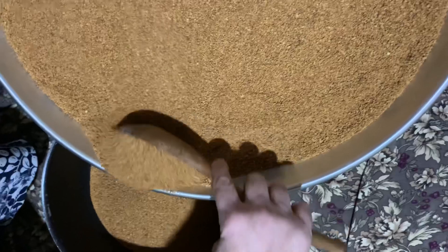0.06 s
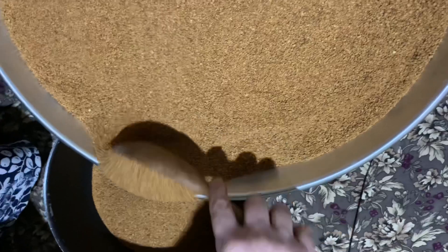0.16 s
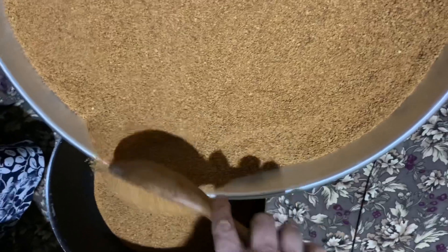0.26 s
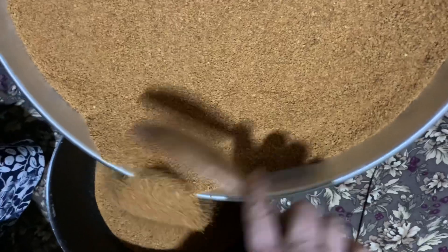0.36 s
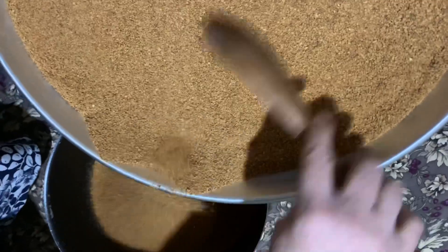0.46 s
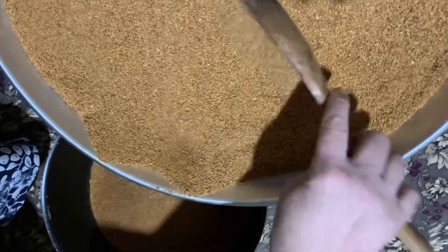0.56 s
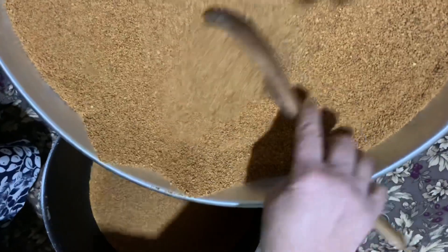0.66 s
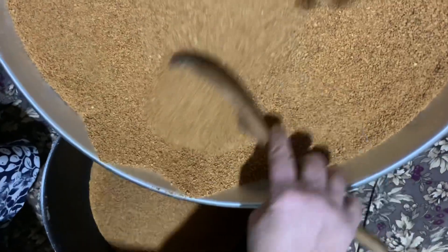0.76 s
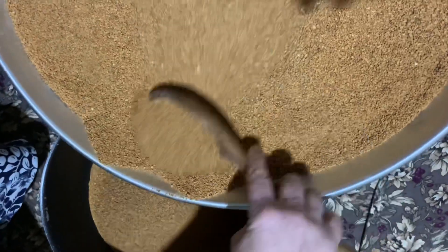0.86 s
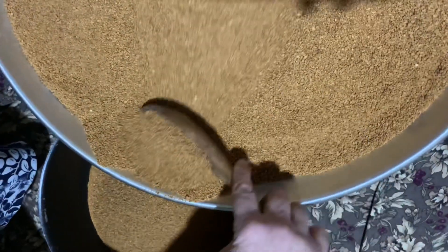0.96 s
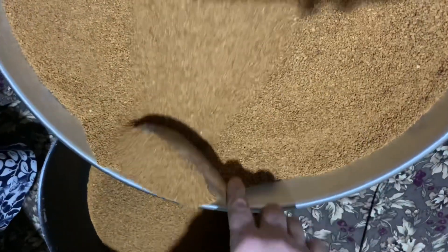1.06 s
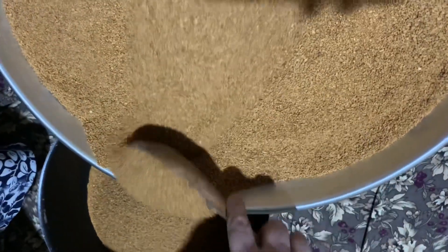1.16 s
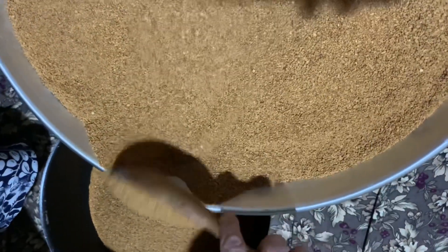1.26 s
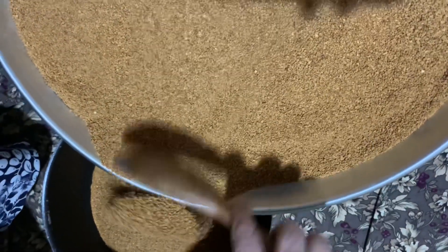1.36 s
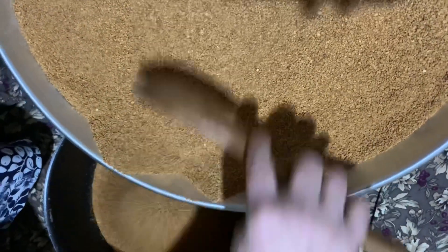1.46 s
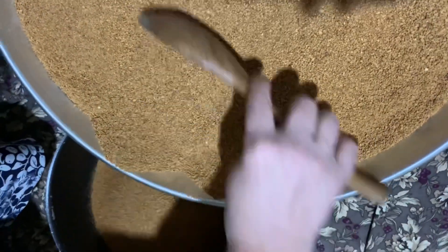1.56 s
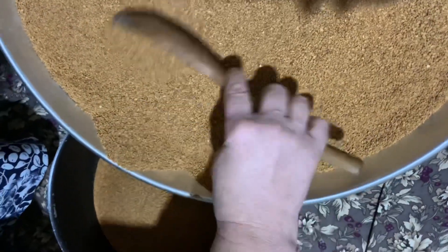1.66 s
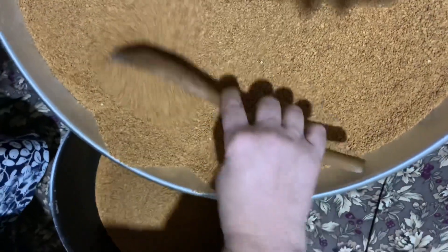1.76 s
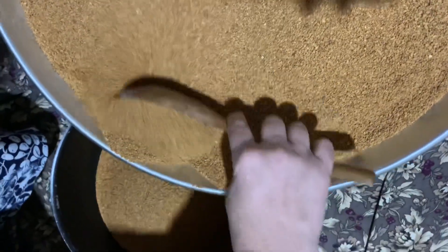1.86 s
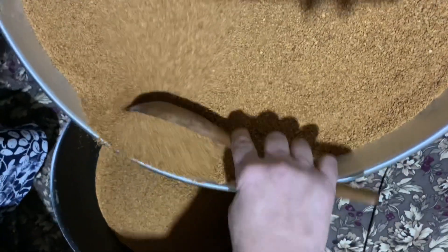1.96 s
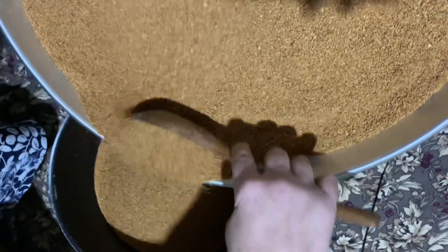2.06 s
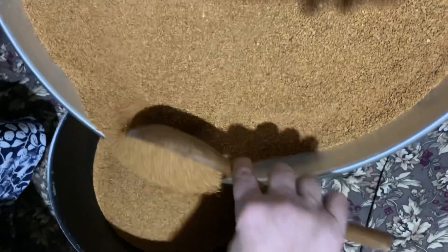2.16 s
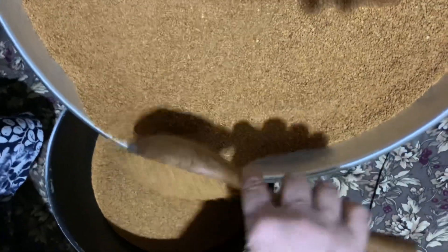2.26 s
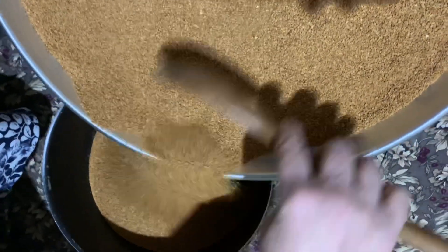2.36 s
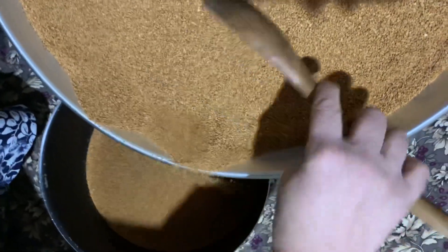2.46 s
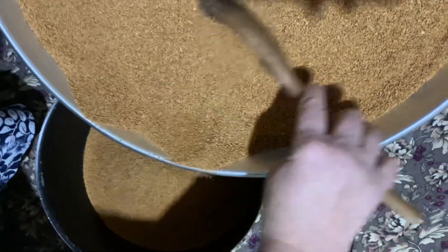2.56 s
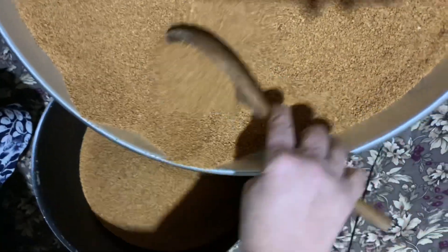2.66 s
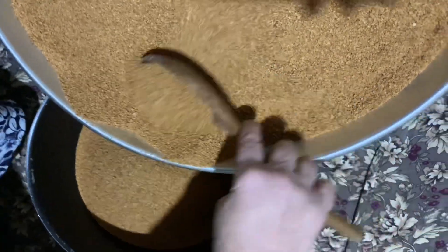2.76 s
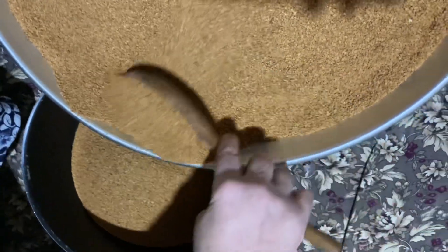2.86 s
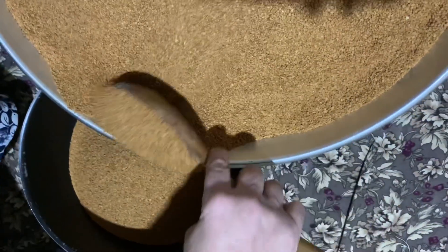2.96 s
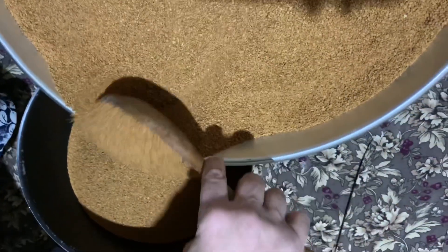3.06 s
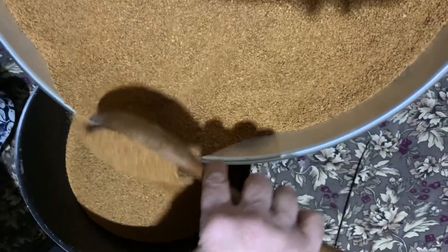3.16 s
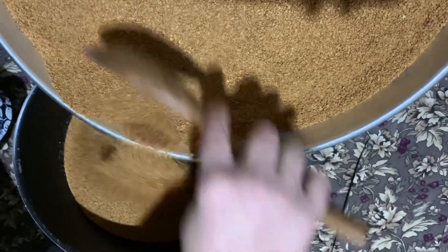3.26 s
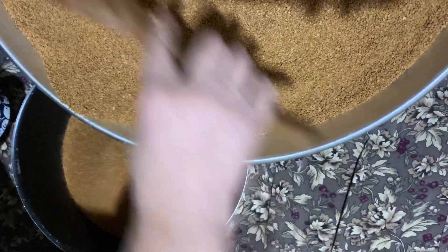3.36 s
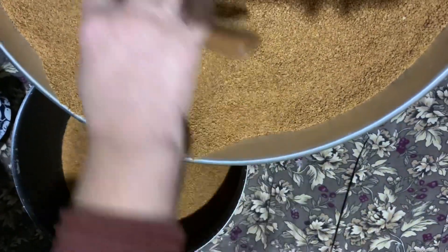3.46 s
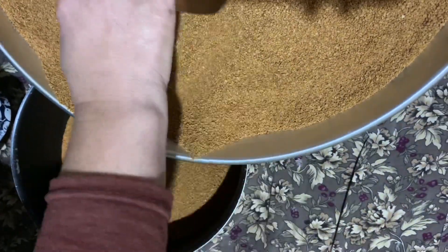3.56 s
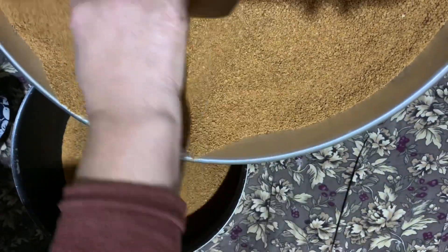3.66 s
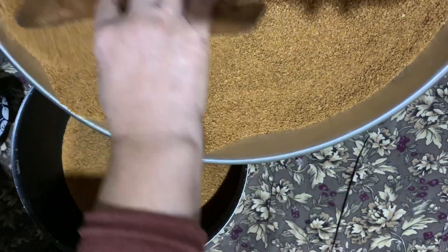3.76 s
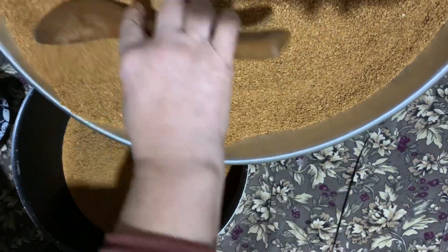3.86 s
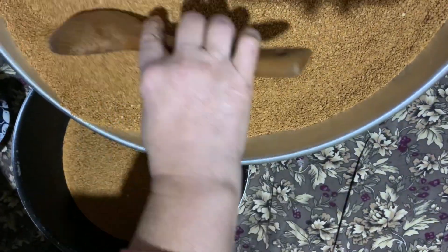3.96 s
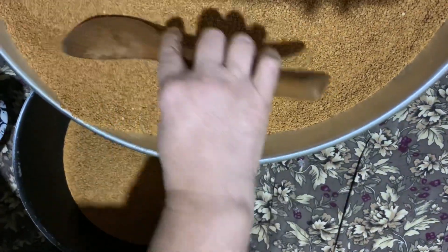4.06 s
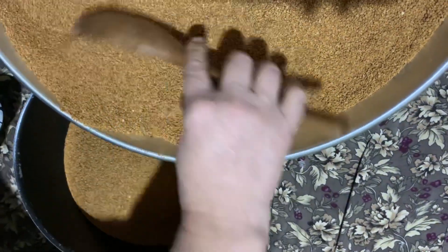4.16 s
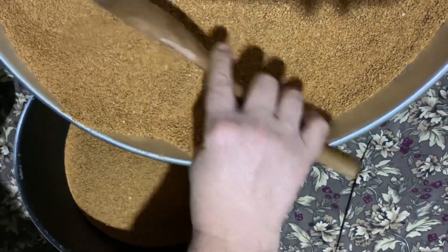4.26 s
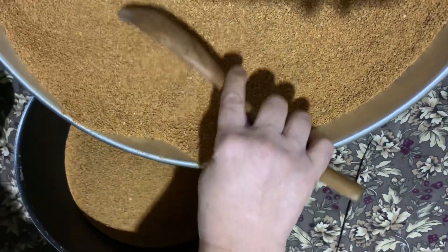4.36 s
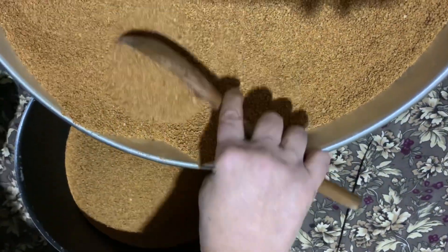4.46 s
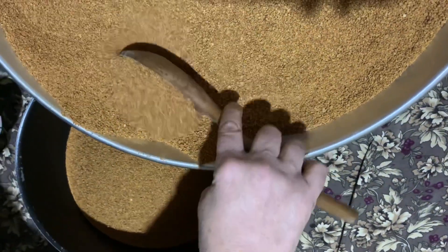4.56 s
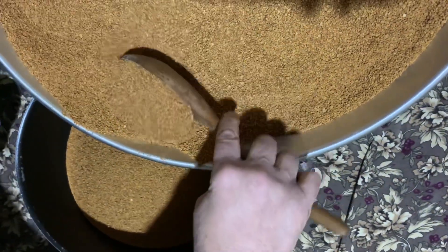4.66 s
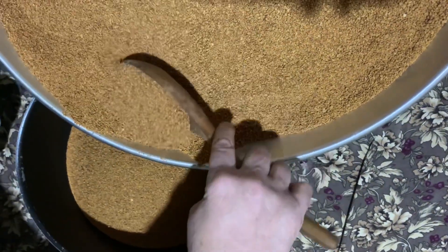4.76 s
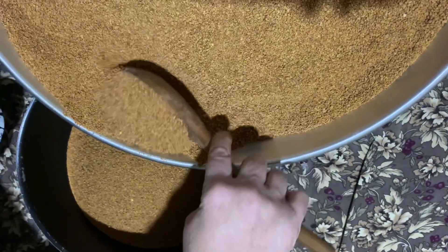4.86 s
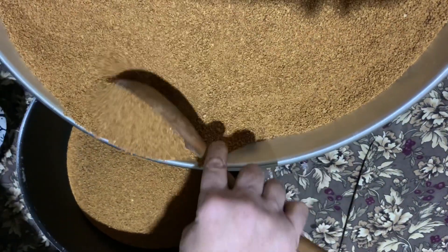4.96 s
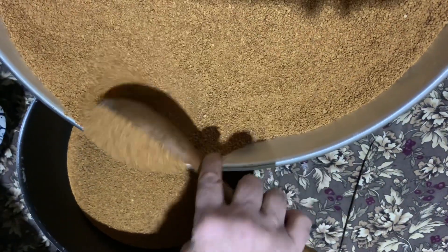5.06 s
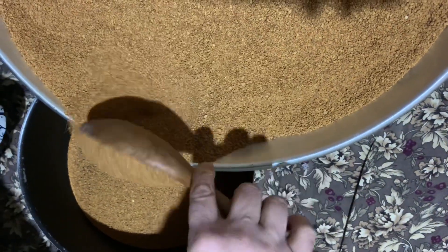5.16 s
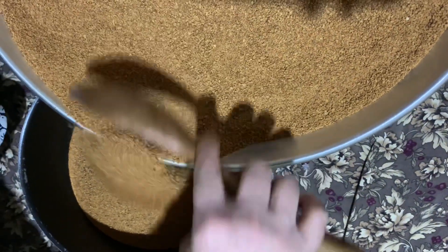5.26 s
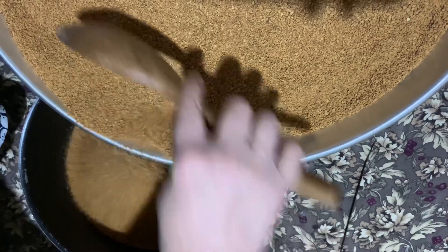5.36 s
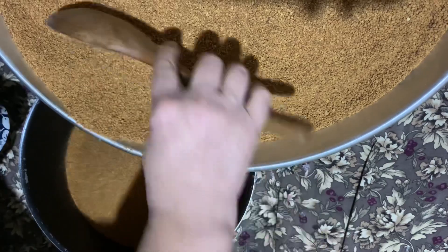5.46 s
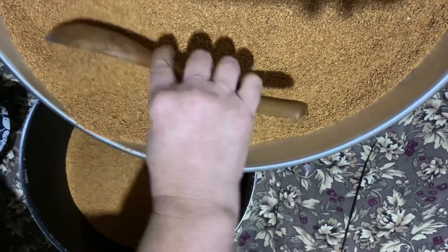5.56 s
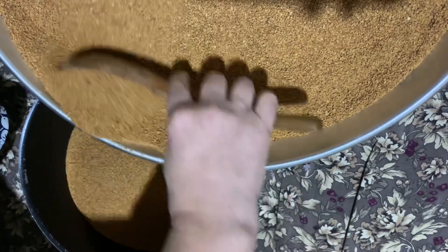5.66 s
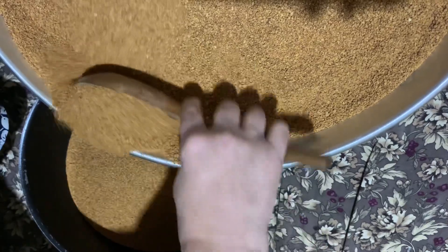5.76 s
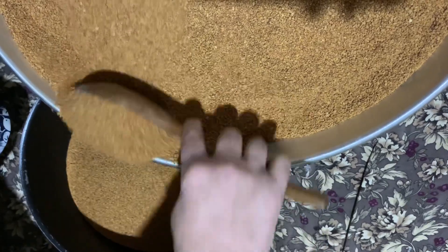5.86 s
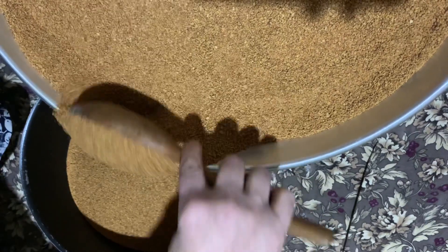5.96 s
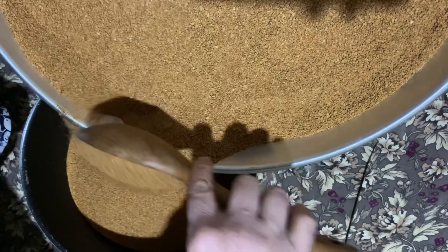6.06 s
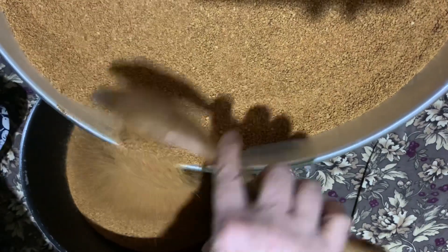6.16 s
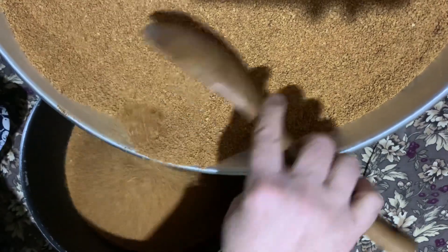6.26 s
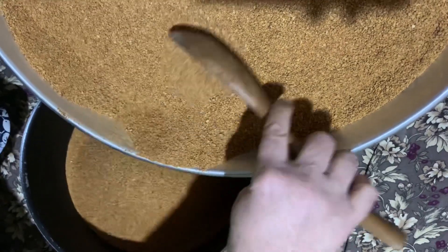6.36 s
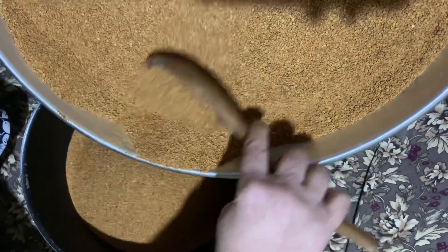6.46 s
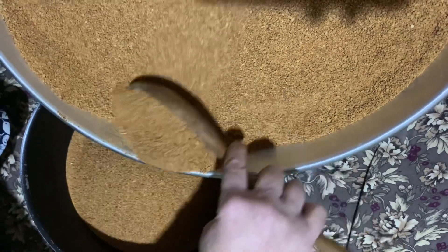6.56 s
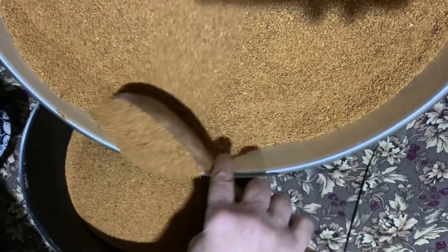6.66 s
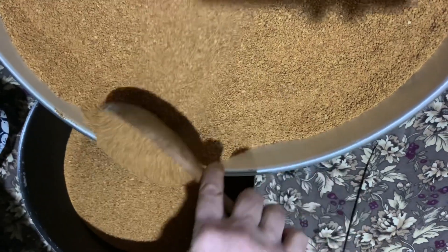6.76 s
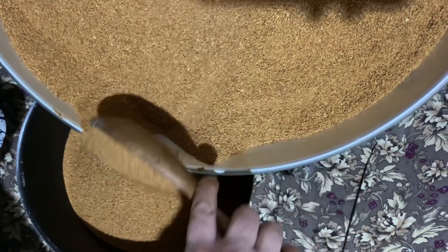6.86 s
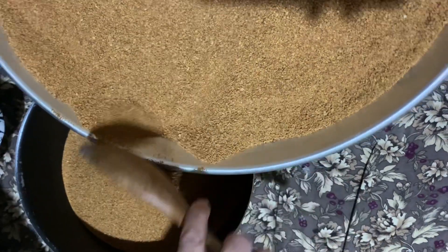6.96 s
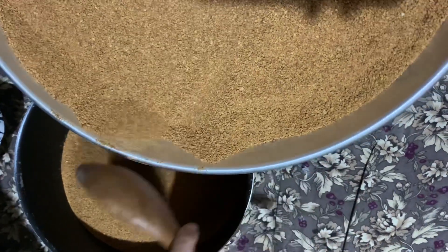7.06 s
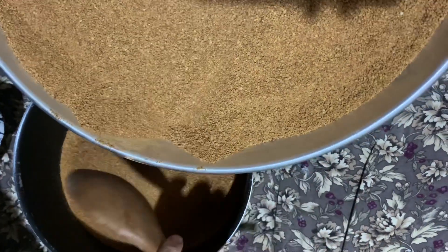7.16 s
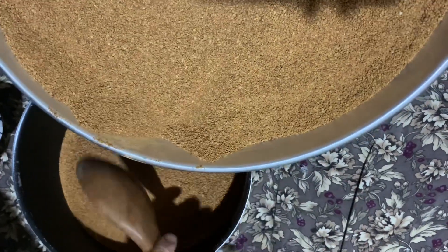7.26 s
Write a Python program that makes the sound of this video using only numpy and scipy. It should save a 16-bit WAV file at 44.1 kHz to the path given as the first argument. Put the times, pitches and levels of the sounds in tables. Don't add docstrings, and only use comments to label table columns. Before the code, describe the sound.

Close up in a quiet kitchen, a wooden spoon plunges into coarse dry meal on a metal tray about once a second. Each stroke starts with a sharp rush of grains and hollow tray thuds with woody clicks, then a fizzing slide and trickle. The last strokes are shorter and it ends nearly silent. Far outside, an engine faintly climbs through gears over traffic rumble. Stereo phone microphone just above.

```python
import sys
import numpy as np
from scipy import signal
from scipy.fft import rfft, irfft, next_fast_len
from scipy.io import wavfile
from scipy.ndimage import uniform_filter1d, map_coordinates

SR = 44100
rng = np.random.default_rng(int(sys.argv[2]) if len(sys.argv) > 2 else 0)


def makeup_ratio(level_db):
    decades = np.asarray(level_db, float) / 20
    return 10 ** decades


def persist_wave(psi):
    counts = np.round(np.clip(psi, -1, 1) * 32767).astype(np.int16)
    wavfile.write(sys.argv[1], SR, np.atleast_2d(counts).T)


N = 322812


def unit(x):
    return x / np.sqrt(np.mean(x ** 2) + 1e-20)


def along(points, hz):
    f, v = np.transpose(points)
    return np.interp(np.log(hz + 1), np.log(f + 1), v)


def curves(rows):
    s, *columns = np.transpose(rows)
    return [np.interp(np.arange(N) / SR, s, column) for column in columns]


def wobble(rate):
    knots = rng.standard_normal(int(N * rate / SR) + 4)
    return map_coordinates(knots, [np.arange(N) * rate / SR])


def filtered(x, response):
    m = next_fast_len(N + SR // 2)
    return irfft(rfft(x, m) * response(np.fft.rfftfreq(m, 1 / SR)), m)[..., :N]


def coloured(x, colour):
    return filtered(x, lambda f: makeup_ratio(along(colour, f)))


# start_s, firing_hz, level_db
ENGINE = [
    [(3.5, 57.1, -64), (3.614, 57.2, -46), (3.698, 59, -44.5), (3.796, 66.4, -51), (4.108, 65.9, -49),
     (4.288, 56.8, -45), (4.582, 52.9, -57), (4.774, 53.1, -57), (4.8, 53.3, -74)],
    [(4.85, 57.1, -64), (4.902, 56.75, -51), (5.128, 57, -45), (5.206, 57.5, -59), (5.334, 65.2, -43.5),
     (5.672, 73.2, -55.5), (5.76, 79.2, -50.5), (6.12, 78.3, -64), (6.2, 83, -65)],
    [(6.65, 100.4, -67), (6.672, 98, -55), (6.782, 101, -47.5), (6.994, 109, -58.5), (7.168, 107.5, -56),
     (7.184, 102.9, -69), (7.202, 105.4, -57.5), (7.262, 107.5, -54.5), (7.32, 108, -66)],
]
OCTAVE_DB = [-22, -12, -23]
# start_s, level_db
RUMBLE = [(0.0, -52), (1.16, -58), (1.49, -51), (2.04, -66), (3.44, -58), (3.73, -53.5), (4.2, -53.5),
          (4.75, -59), (5.32, -51), (5.99, -53), (7.32, -58)]
# pitch_hz, level_db (per Hz)
KITCHEN = [(25, -4), (55, 9.5), (100, 5.5), (160, -2.5), (350, -10.5), (1000, -49), (3000, -32.5),
           (8000, -42.5), (15000, -49.5)]


def street():
    drone, t = np.zeros(N), np.arange(N) / SR
    for gear, octave_db in zip(ENGINE, OCTAVE_DB):
        hz, db = curves(gear)
        begin, end = gear[0][0], gear[-1][0] + 0.044
        fade = np.clip(np.minimum(t - begin, end - t) / 0.057, 0, 1)
        phase = 2 * np.pi * np.cumsum(hz * (1 + 0.0202 * wobble(26))) / SR
        tone = np.sin(phase) + makeup_ratio(octave_db) * np.sin(2 * phase)
        drone += fade * makeup_ratio(5.5 + 1.3 * wobble(18)) * makeup_ratio(db) * tone
    hush = unit(coloured(rng.standard_normal((2, N)), KITCHEN))
    return drone + makeup_ratio(curves(RUMBLE)[0] - 1.5 + 1.2 * wobble(2.5)) * hush


SQUEAK_S, SQUEAK_LENGTH_S, SQUEAK_DB = 7.22, .09, -65
SQUEAK_HZ, SQUEAK_SAG_HZ_PER_S = 2130, 1900


def squeak():
    u = np.clip(np.arange(N) / SR - SQUEAK_S, 0, SQUEAK_LENGTH_S)
    swell = np.sin(np.pi * u / SQUEAK_LENGTH_S)
    return makeup_ratio(SQUEAK_DB) * swell * np.sin(2 * np.pi * (SQUEAK_HZ - SQUEAK_SAG_HZ_PER_S * u / 2) * u)


# start_s (middle), half_width_s, pitch_hz, level_db
RUBS = [(0.531, .012, 2100, -34.5), (1.751, 0.019, 4100, -48), (1.985, 0.045, 3940, -46),
        (1.99, 0.038, 1670, -49.5), (2.049, .02, 2940, -53), (3.4, 0.063, 4000, -55.5),
        (3.42, 0.055, 2020, -60.5), (3.7, .05, 3920, -62), (4.22, 0.046, 2120, -54),
        (4.22, 0.047, 4000, -61), (2.961, 0.032, 3250, -56), (5.59, .015, 3300, -42.5),
        (5.601, .02, 1200, -48.5), (5.74, 0.037, 4180, -45.5), (5.776, 0.017, 3400, -47),
        (5.81, .03, 4160, -44), (5.892, .02, 3180, -52.5), (6.92, 0.037, 6200, -60.5),
        (7.09, 0.043, 4200, -73), (7.11, 0.075, 2010, -72.5), (7.14, .03, 5180, -78.5),
        (7.12, 0.044, 3000, -74), (7.0, 0.038, 3700, -74), (7.22, 0.0057, 6350, -58),
        (7.255, 0.032, 3020, -76), (7.26, .03, 5000, -86)]
RUB_WIDTH, RUB_CHATTER_DB = 0.13, 2


def rubs():
    out, t = np.zeros((2, N + SR)), np.arange(-SR // 8, SR // 8) / SR
    chatter = makeup_ratio(RUB_CHATTER_DB * wobble(160))
    for (s, half, hz, db), noise in zip(RUBS, rng.standard_normal((len(RUBS), 2, len(t)))):
        tone = unit(signal.lfilter(*signal.iirpeak(hz, 1 / RUB_WIDTH, SR), noise))
        out[:, round(s * SR) - SR // 8:][:, :len(t)] += makeup_ratio(db - 5 * (t / half) ** 2) * tone
    return chatter * out[:, :N]


LATE_S = .001
# start_s, level_db (peak), pitch_hz
CLICKS = [(0.047, -26.5, 915), (0.071, -37, 770), (0.125, -45, 800), (0.457, -28.5, 746), (0.464, -24, 760),
          (0.479, -21.5, 791), (0.528, -26, 751), (0.551, -36, 764), (0.567, -29, 1060), (0.597, -39, 1280),
          (0.656, -32.5, 760), (0.696, -33, 1000), (0.975, -42, 894), (1.103, -34, 1310), (1.333, -50, 775),
          (1.49, -26, 784), (1.517, -27, 1240), (1.522, -23.5, 970), (1.56, -26, 751), (1.56, -21.5, 794),
          (1.573, -28.5, 802), (1.617, -40, 851), (1.643, -38.5, 751), (2.391, -27.5, 856),
          (2.406, -23.5, 1040), (2.775, -30, 1010), (2.789, -33.5, 842), (2.808, -34, 993),
          (3.464, -32, 902), (3.636, -32, 923), (4.233, -42, 867), (4.289, -21, 789), (5.399, -18, 950),
          (5.429, -19, 826), (5.464, -22.5, 907), (5.523, -28, 1060), (5.583, -33, 1170),
          (5.687, -44, 1350), (6.226, -23, 751), (6.268, -32, 751), (6.434, -34, 756), (6.494, -38, 1500),
          (6.513, -31, 1190)]
CLICK_DB, CLICK_CYCLES = -1.5, 13
# start_s, level_db (peak), pitch_hz
TICKS = [(0.0474, -37, 2200), (0.071, -43.5, 2380), (0.4574, -24, 2240), (0.4654, -28.5, 1770),
         (0.4907, -24.5, 1470), (0.4893, -22.5, 3650), (0.5252, -25.5, 1920), (0.5516, -24.5, 2160),
         (0.5674, -28.5, 1840), (0.5774, -34.5, 2190), (0.5975, -42, 1890), (0.6285, -36, 2210),
         (0.6564, -36.5, 2160), (0.696, -41.5, 1870), (1.103, -41, 3700), (1.489, -32, 2270),
         (1.5174, -21, 1510), (1.5214, -23, 2170), (1.5604, -16.5, 1630), (1.5624, -18, 1620),
         (1.5734, -26.5, 1700), (1.6174, -37, 2430), (1.9634, -38, 3990), (2.3735, -34.5, 1970),
         (2.3898, -21, 2610), (2.3935, -23.5, 3660), (2.4014, -22, 2070), (2.408, -24, 2000),
         (2.417, -23.5, 2030), (2.7742, -32, 1560), (2.79, -40, 1780), (2.8074, -41, 1560),
         (2.9739, -20, 2050), (3.357, -31, 3200), (3.464, -33, 1730), (4.2887, -14, 2120),
         (5.3993, -25.5, 1520), (5.427, -35, 2090), (5.4634, -38, 1880), (5.582, -37, 3260),
         (5.7339, -34, 3990), (5.7678, -36, 3460), (5.8047, -30, 3250), (5.8333, -33, 2900),
         (6.228, -29.5, 2020), (6.268, -29, 1970), (6.4966, -37, 3700), (6.5124, -32, 3030),
         (6.5665, -36, 3050), (6.6474, -41.5, 3650)]
TICK_DB, TICK_CYCLES = 0.5, 16
OVERTONE_RATIO, CRACK, CRACK_S = 2.1, 0.92, .007


def clicks(rows, gain_db, cycles):
    out, t = np.zeros(N + SR), np.arange(SR // 40) / SR
    for (s, db, hz), noise in zip(rows, rng.standard_normal((len(rows), len(t)))):
        tone = np.sin(2 * np.pi * hz * t) + .3 * np.sin(2 * np.pi * OVERTONE_RATIO * hz * t)
        ring = tone * makeup_ratio(-60 * t * hz / cycles)
        crack = CRACK * uniform_filter1d(noise, size=5) * makeup_ratio(-60 * t / CRACK_S)
        out[round((s + LATE_S) * SR):][:len(t)] += makeup_ratio(db + gain_db) * (ring + crack)
    return out[:N]


def grains(per_second, spread_db, smooth):
    chance, size = rng.random((2, 2, N))
    sizes = makeup_ratio(-spread_db * np.log(size + 0.086))
    hits = (chance < per_second / SR) * sizes * rng.standard_normal((2, N))
    smooth = np.clip(smooth, 0, 1)
    return np.sqrt(1 - smooth) * unit(hits) + np.sqrt(smooth) * rng.standard_normal((2, N))


# start_s, level_db (thud peak), pitch_hz (local thud), crunch_db (over thud)
KNOCKS = [(0.049, -19, 346, -14.5), (0.457, -8.5, 380, -5.5), (0.463, -12.5, 324, -12.5),
          (.479, -7, 358, -9), (.527, -17.5, 400, -5.5), (0.566, -21.5, 352, -4), (0.657, -24, 557, -8.5),
          (0.697, -19.5, 264, -32.5), (0.978, -34, 165, -17), (1.103, -27.5, 280, -9),
          (1.491, -9, 264, -7.5), (1.557, -13, 396, 4), (1.5606, -1, 335, -9.5), (2.371, -28.5, 350, 4),
          (2.393, -11.5, 350, -15.5), (2.406, -7, 353, -5), (3.466, -18, 277, -16.5),
          (3.637, -23.5, 380, -15), (4.278, -17.5, 360, -25), (4.288, -11, 480, -11.5),
          (4.308, -34.5, 377, -5.5), (5.401, -9.5, 524, -7), (5.429, -18, 360, -7), (5.462, -29.5, 380, -1),
          (6.229, -14.5, 326, -3.5)]
BARE_RIM_DB, BARE_KNOCK_DB = -3.5, -12.5
# start_s, level_db (thud peak), pitch_hz (local thud), crunch_db (over thud)
THUDS = [(.072, -27.5, 268, -0.5), (0.124, -23, 358, -24), (.315, -38.5, 377, -25), (.489, -14.5, 330, 6),
         (.492, -8.5, 264, -17.5), (.534, -6, 282, -22.5), (1.333, -27.5, 473, -18), (1.517, -9, 350, -1),
         (1.523, -1, 313, -16), (1.572, -13.5, 280, -14), (1.586, -14, 350, -4), (1.639, -23, 550, -2),
         (2.398, -11.5, 348, -7.5), (2.401, -13.5, 330, -13.5), (2.412, -13, 346, -12),
         (2.418, -13, 246, -25), (2.565, -32, 380, -16.5), (2.79, -24, 368, -7), (2.808, -29.5, 140, -7),
         (2.971, -18.5, 372, -8), (3.159, -36.5, 478, -6), (3.345, -36.5, 496, -8), (3.545, -30, 344, -14),
         (3.655, -24.5, 390, -20), (4.295, -19, 410, -32), (5.418, -14.5, 378, -28),
         (5.702, -21, 494, -15.5), (5.871, -30, 363, -23), (6.221, -21, 567, -6.5), (6.513, -24.5, 260, 5),
         (6.648, -25, 261, -4), (6.757, -27.5, 273, -24)]
SOFT_RIM_DB, SOFT_KNOCK_DB = -18.5, -16
# start_s, level_db (crunch peak), knock_db (over crunch)
BITES = [(.423, -22, -29), (0.553, -26, -4), (0.597, -32.5, -29.5), (1.416, -26.5, -44.5),
         (1.485, -25.5, -3.5), (2.35, -34.5, -12), (2.773, -23, 3), (3.328, -40.5, -36), (5.31, -32.5, -34),
         (5.582, -27, -4), (5.733, -34.5, -3.5), (5.77, -37, -12), (5.804, -40, -7), (5.831, -42, -4),
         (6.193, -23.5, -18), (6.267, -22, -9), (6.435, -31, -12), (6.497, -17.5, -8.5), (6.567, -25.5, -5),
         (7.213, -41.5, -24)]
BITE_THUD_DB, BITE_HZ, BITE_RIM_DB = -10, 350, -3.5


def contacts():
    bare = [(s, db, hz, BARE_RIM_DB, BARE_KNOCK_DB, crunch_db) for s, db, hz, crunch_db in KNOCKS]
    soft = [(s, db, hz, SOFT_RIM_DB, SOFT_KNOCK_DB, crunch_db) for s, db, hz, crunch_db in THUDS]
    bites = [(s, db + BITE_THUD_DB, BITE_HZ, BITE_RIM_DB, knock_db - BITE_THUD_DB, -BITE_THUD_DB)
             for s, db, knock_db in BITES]
    return bare + soft + bites


def strike(modes, t, level_db):
    ring = sum(makeup_ratio(db + extra - 60 * t / t60) * np.sin(2 * np.pi * hz * t)
               for (hz, t60, db), extra in zip(modes, level_db))
    return ring / np.abs(ring).max()


# pitch_hz, t60_s, level_db
TRAY = [(131, 0.011, -14), (195, 0.094, -10.5), (264, 0.2, -5.5), (350, 0.11, -1), (424.2, 0.081, -4.5),
        (530.8, 0.094, -5.5)]
# pitch_hz, t60_s, level_db
RIM = [(608, 0.031, 4.5), (711.5, 0.039, 4.5), (793, 0.034, 4), (916, 0.025, 4), (1056, 0.018, 2.5),
       (1147, 0.06, -6)]
# pitch_hz, t60_s, level_db
SPOON = [(1615, .03, -12), (1870, 0.051, 13), (2070, 0.098, 18), (3650, 0.013, 20)]
# pitch_hz, level_db (per Hz)
RASP = [(700, -9), (1300, -6.5), (1900, -4), (2500, -4.5), (3200, -7.5), (4500, -11), (6000, -14.5),
        (8000, -19.5)]
# pitch_hz, level_db (per Hz)
FIZZ = [(1500, -19.5), (3000, -14), (5000, -14.5), (7000, -9.5), (8600, -4), (10200, -4.5), (11500, -2.5),
        (13500, -5), (15500, -4.5)]
DENT_CYCLES = 6.1
SNAP, SNAP_RATIO, SNAP_S = 0.35, 1.7, 0.015


def bumps():
    out, t = np.zeros((2, N + SR)), np.arange(SR // 5) / SR
    crush = np.zeros((2, N + SR))
    luck = rng.standard_normal((len(contacts()), 3, len(TRAY)))
    for (s, db, hz, rim_db, knock_db, crunch_db), own in zip(contacts(), luck):
        start = round((s + LATE_S) * SR)
        at = slice(start, start + len(t))
        dent = np.sin(2 * np.pi * hz * t) * makeup_ratio(-60 * (t * hz / DENT_CYCLES) ** 2)
        snap = SNAP * np.sin(2 * np.pi * SNAP_RATIO * hz * t) * makeup_ratio(-60 * t / SNAP_S)
        thud = snap + 0.7 * dent + 0.5 * strike(TRAY, t, 4 * own[0])
        thud += makeup_ratio(rim_db + 7.5) * strike(RIM, t, 4 * own[1])
        thud *= 1 - np.exp(-t / 0.0015)
        knock = strike(SPOON, t, 3 * own[2])
        out[:, at] += makeup_ratio(db - 3.0) * thud + makeup_ratio(db + knock_db - 11.5) * knock
        crush[0, at] += makeup_ratio(db + knock_db - 1 - 60 * t / 0.035) * (1 - np.exp(-t / 0.0023))
        crush[1, at] += makeup_ratio(db + crunch_db - 1.0) * (makeup_ratio(-60 * t / 0.0084) + 0.35 * makeup_ratio(-60 * t / 0.03))
    dull, bright = [unit(coloured(grains(8000, 2.48, smooth=0.55), colour)) for colour in (RASP, FIZZ)]
    return out[:, :N] + crush[0, :N] * dull + crush[1, :N] * bright


# start_s, pull_s, flow_db (grains), drag_db (spoon), fade_db_per_s (trickle)
STROKES = [
    (-.1, 0.2, -51, -61.5, 36),
    (0.424, 0.61, -44, -55, 41),
    (1.415, 0.57, -43.5, -55.5, 24.5),
    (2.351, 0.69, -51, -58.5, 32.5),
    (3.324, 0.68, -47.5, -58.5, 120),
    (4.158, 0.48, -55, -61.5, 9.5),
    (5.307, 0.59, -44, -56.5, 65),
    (6.192, 0.47, -46.5, -60, 46.5),
    (7.208, 0.0075, -59, -66.5, 252),
]


def humps(rows, clock):
    s, half, *levels = np.transpose(rows)[..., None]
    plunges = np.transpose(STROKES)[0]
    begun = clock >= plunges[np.searchsorted(plunges, s) - 1]
    bell = begun * makeup_ratio(-12 * ((clock - s) / half) ** 2)
    return [(makeup_ratio(2 * db) * bell).sum(axis=0) for db in levels]


# start_s (middle), half_width_s, flow_db
SPILLS = [(.27, 0.035, -68), (.48, 0.056, -44), (.6, .05, -43), (.97, 0.1, -46.5), (1.3, 0.036, -65),
          (1.55, 0.039, -46), (1.76, 0.076, -45.5), (1.98, 0.082, -44), (2.41, 0.09, -45), (2.66, .08, -50),
          (2.815, 0.056, -46.5), (3.68, .1, -49.5), (4.05, .03, -50.5), (4.17, .07, -46.5),
          (4.28, .04, -43), (4.75, .06, -53.5), (4.9, 0.11, -54), (5.05, 0.053, -53.5), (5.19, 0.11, -63),
          (5.42, 0.071, -49.5), (5.6, 0.038, -47), (5.72, 0.056, -49), (6.23, 0.022, -38.5),
          (6.5, 0.068, -43.5), (6.93, 0.03, -56.5), (7.05, 0.067, -69.5), (7.32, .008, -57.5)]
# start_s (middle), half_width_s, scrape_db, weight_db (on the tray)
SHOVES = [(.07, 0.039, -53.5, -55), (.48, 0.032, -46.5, -44.5), (.6, 0.092, -52, -58),
          (.97, 0.06, -52, -61), (1.1, 0.034, -58.5, -57.5), (1.3, 0.017, -75.5, -63),
          (1.45, 0.01, -95, -57.5), (1.55, 0.066, -50.5, -48), (2.02, 0.072, -56.5, -56),
          (2.08, 0.01, -62, -56), (2.2, 0.049, -88, -76.5), (.28, 0.069, -82, -71.5),
          (2.41, 0.022, -44.5, -46.5), (2.65, 0.093, -57.5, -61), (2.805, 0.038, -49, -66.5),
          (3.44, 0.0442, -59.5, -53), (3.64, 0.21, -83, -61), (4.18, 0.058, -71, -57.5),
          (4.28, 0.041, -55.5, -44.5), (4.5, 0.19, -66, -70), (4.92, 0.089, -63, -68),
          (5.42, 0.045, -52.5, -42.5), (5.6, 0.015, -64.5, -56), (5.8, 0.07, -55, -74),
          (6.24, 0.024, -46.5, -41.5), (6.35, 0.072, -58, -53.5), (6.5, 0.11, -55.5, -78),
          (6.65, 0.021, -51.5, -77), (6.73, 0.061, -64.5, -56.5)]
PLUNGE_S, DIG_IN_S = 0.0021, 0.069
PULL_SAG_DB_PER_S = 10.5
LIFT_S, LIFT_FLOW_DB, LIFT_DRAG_DB = 0.0097, -1, -5.5


def motion():
    start, pull, flow_db, drag_db, fade = np.transpose(STROKES)[..., None]
    clock = np.arange(N * 1000 // SR + 2) / 1000
    since = clock - start
    after = np.maximum(clock - start - pull, 0)
    shape_db = -PULL_SAG_DB_PER_S * np.clip(since, 0, pull) - fade * after
    lifted = np.clip(after / LIFT_S, 0, 1)

    def power(db, fall_db, rise_s):
        rise = np.clip(since / rise_s, 0, 1) ** 2
        return (rise * makeup_ratio(2 * (db + shape_db + fall_db * lifted))).sum(axis=0)

    flow = power(flow_db, LIFT_FLOW_DB, PLUNGE_S)
    drag = power(drag_db, LIFT_DRAG_DB, DIG_IN_S)
    (spill,), (scrape, weight) = humps(SPILLS, clock), humps(SHOVES, clock)
    powers = flow + spill, drag + scrape, drag + weight
    return [np.interp(np.arange(N) / SR, clock, np.sqrt(p)) for p in powers]


def ringing(modes, damping):
    def response(f):
        total = 0
        for k, (centre, t60, db) in enumerate(modes):
            loss = 1j * f * damping * np.log(1000) / (np.pi * t60)
            total = total + (-1) ** k * makeup_ratio(db) * loss / (centre * centre - f * f + loss)
        return total
    return response


def patchy(x, depth_db):
    z = signal.stft(x, nperseg=512)[2]
    field = uniform_filter1d(rng.standard_normal(z.shape[1:]), size=9, axis=0)
    field = uniform_filter1d(field, size=7, axis=1)
    return signal.istft(z * makeup_ratio(depth_db * unit(field)), nperseg=512)[1][:, :N]


# pitch_hz, level_db (per Hz)
CRACKLE = [(900, -17.5), (1800, -5.5), (2600, -1), (4000, 0), (6000, -3), (9000, -12.5)]
WALL_DB, FLOOR_DB = 1, 7


def meal():
    flow, scrape, weight = motion()
    clump = wobble(30)
    fizz = coloured(makeup_ratio(0.6 * wobble(200)) * grains(14000, 0.72, smooth=0.69), FIZZ)
    rasp = coloured(makeup_ratio(1.7 * wobble(150)) * grains(4000, 1.4, smooth=0.55), RASP)
    wall = filtered(makeup_ratio(3.5 * wobble(90)) * grains(1400, 3.8, smooth=0.86), ringing(RIM, damping=0.79))
    drum = filtered(makeup_ratio(4.4 * wobble(60)) * grains(900, 1.53, smooth=0.85), ringing(TRAY, damping=0.87))
    crackle = coloured(makeup_ratio(5.8 * wobble(40)) * grains(260, 5, smooth=0), CRACKLE)
    tray = makeup_ratio(WALL_DB + 2.5) * unit(wall) + makeup_ratio(FLOOR_DB + 2.0) * unit(drum)
    return (scrape * makeup_ratio(1) * unit(crackle)
            + flow * makeup_ratio(9.0 + 1.6 * clump) * unit(patchy(fizz, depth_db=2.5))
            + scrape * makeup_ratio(9 + 0.88 * clump) * unit(patchy(rasp, depth_db=3.0))
            + weight * makeup_ratio(1.3 * clump) * tray)


def scene():
    edge = clicks(CLICKS, CLICK_DB, CLICK_CYCLES) + clicks(TICKS, TICK_DB, TICK_CYCLES)
    return meal() + bumps() + street() + edge + rubs() + squeak() * [[0], [1]]


GATE_DB, GATE_HZ, GATE_FLOOR = -100, 2900, .2
QUIET_DB = -89


def joint(pair, under_db, from_hz, size=10):
    sum_and_difference = np.array([pair[0] + pair[1], pair[0] - pair[1]]) / 2
    hz, _, z = signal.stft(sum_and_difference, SR, nperseg=1280)
    band = np.arange(len(hz)) // size
    power = np.add.reduceat(np.abs(z) ** 2, np.arange(0, len(hz), size), axis=1)
    power = uniform_filter1d(power, size=3, axis=2)
    keep = (power > makeup_ratio(2 * under_db) * power[::-1])[:, band] | (hz < from_hz)[:, None]
    treble = (np.abs(z[:, hz > GATE_HZ]) ** 2).mean(axis=(0, 1))
    keep = np.maximum(keep, 1 / (1 + (treble / makeup_ratio(2 * QUIET_DB)) ** 2))
    gate = np.maximum(treble / (treble + makeup_ratio(2 * GATE_DB)), GATE_FLOOR)
    keep = keep * np.where((hz > GATE_HZ)[:, None], gate, 1)
    total, difference = signal.istft(z * keep, SR, nperseg=1280)[1][:, :N]
    return np.array([total + difference, total - difference])


def roll_off(x):
    return signal.sosfilt(signal.butter(12, 16980, fs=SR, output="sos"), x)


# pitch_hz, likeness (0-1)
ALIKE = [(60, .96), (400, .98), (800, .9), (1400, .55), (2200, .6), (2900, .4), (3600, .1), (4700, .1),
         (5400, .3), (6500, .55), (8300, .9), (15000, .92)]
# start_s, length_s, focus (0-1)
FAR_SIDE = [
    (.56, .37, .65),
    (1.62, .16, .5),
    (2.54, .16, .55),
]
# pitch_hz, lead_half_cycles
LEAD = [(0, 0), (900, .21), (2950, 1), (5300, 1), (6400, 0), (8450, -1), (11050, -2), (13450, -3),
        (15700, -4)]
# pitch_hz, level_db
LEFT = [(100, 0.5), (400, 2.5), (1300, 5.5), (2400, 2.5), (4400, -1.5), (8000, 1.5)]
# pitch_hz, level_db (per Hz)
HISS = [(300, -3), (800, 4), (2500, -16.5), (5000, -11.5), (9000, -22.5)]
HISS_DB, TOP_HZ = -77, 15750


def record(dry):
    def share(f):
        return np.arccos(np.clip(along(ALIKE, f), 0, 1)) / 2

    def port(f):
        lead = np.pi * np.interp(f, *np.transpose(LEAD)) / 2
        return np.exp(1j * np.outer([1, -1], lead)) * makeup_ratio(np.outer([.5, -.5], along(LEFT, f)))

    def band(f):
        return np.where(f < TOP_HZ, 1, makeup_ratio(-50)) * f ** 2 / (f ** 2 + 42 ** 2)

    same = filtered(dry[0], lambda f: np.cos(share(f)))
    other = filtered(dry[1], lambda f: 1j * np.sin(share(f)))
    t = np.arange(N) / SR
    focus = sum(v * np.clip(1 + np.minimum(t - s, s + length - t) / .06, 0, 1) for s, length, v in FAR_SIDE)
    other -= focus * filtered(other, lambda f: np.exp(-((f - 2900) / 350) ** 2))
    ports = filtered(np.array([same + other, same - other]), lambda f: port(f) * band(f))
    ports = joint(ports, under_db=-6.2, from_hz=2300)
    hiss = filtered(rng.standard_normal((2, N)), lambda f: makeup_ratio(along(HISS, f)) * band(f))
    ports = ports + makeup_ratio(HISS_DB) * unit(hiss)
    ports = ports / (1 + np.abs(ports / .95) ** 4) ** (1 / 4)
    return roll_off(ports)


dry = scene()
out = record(dry)
persist_wave(out)
```